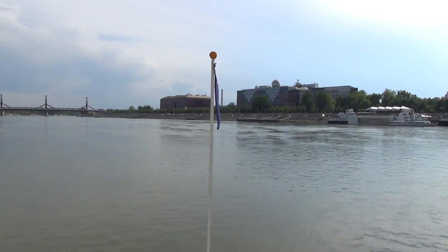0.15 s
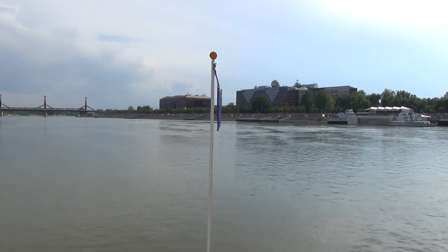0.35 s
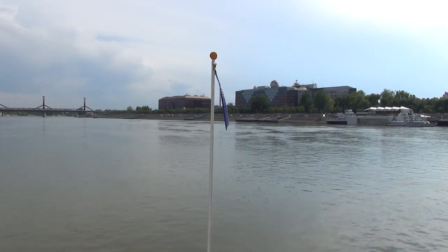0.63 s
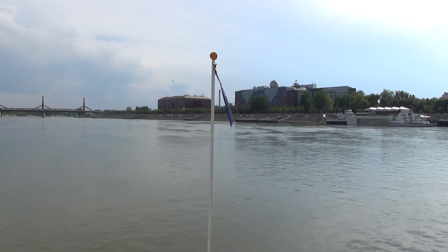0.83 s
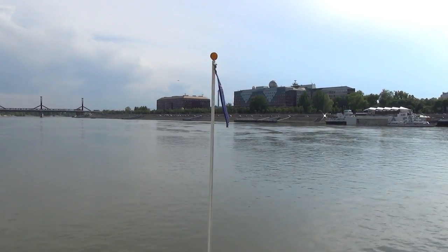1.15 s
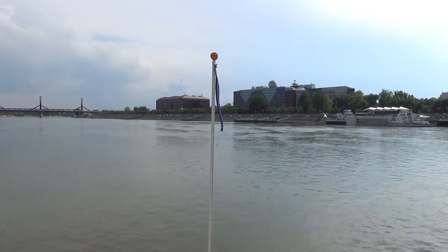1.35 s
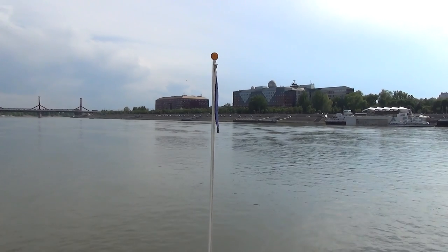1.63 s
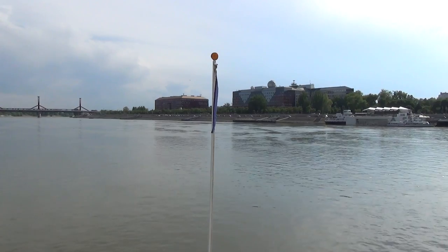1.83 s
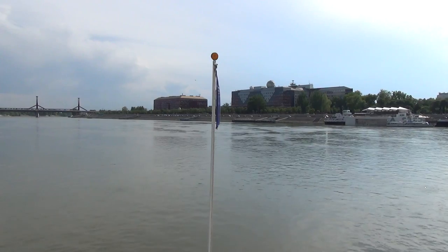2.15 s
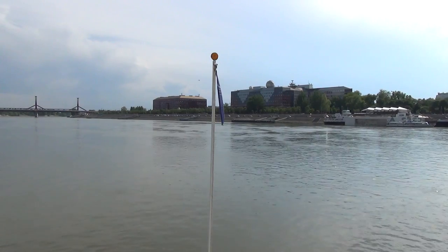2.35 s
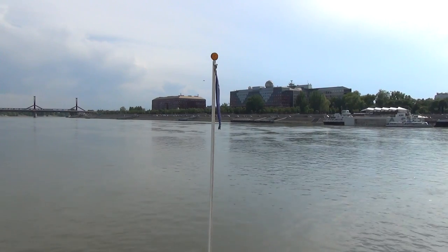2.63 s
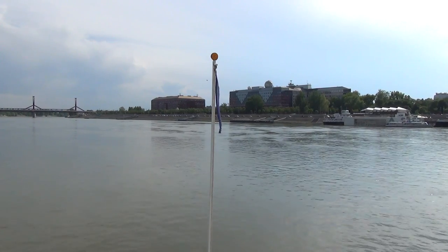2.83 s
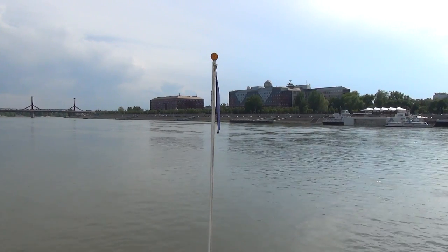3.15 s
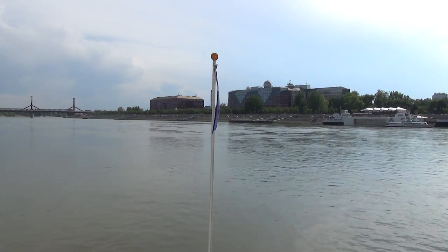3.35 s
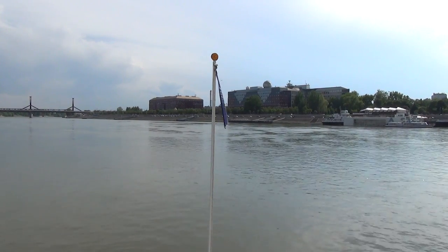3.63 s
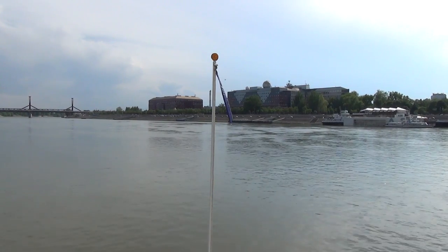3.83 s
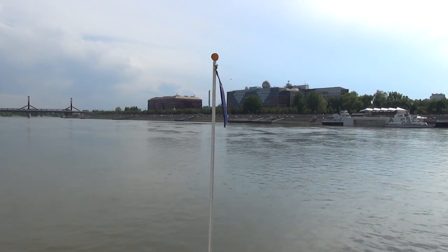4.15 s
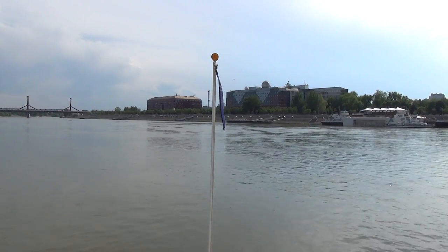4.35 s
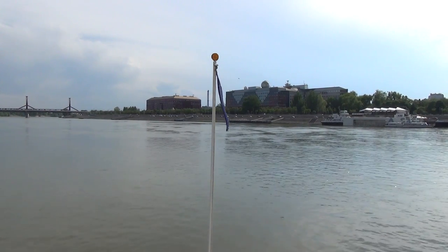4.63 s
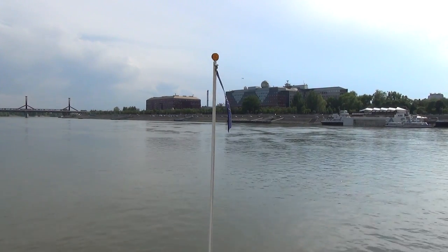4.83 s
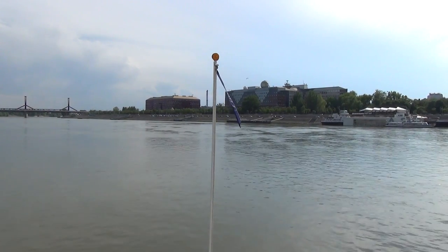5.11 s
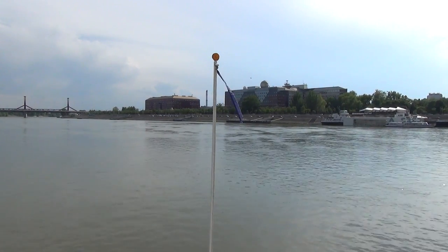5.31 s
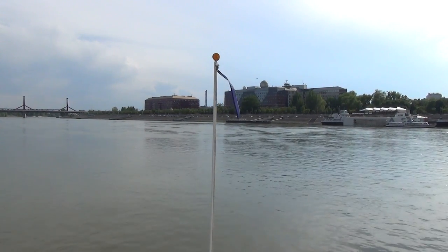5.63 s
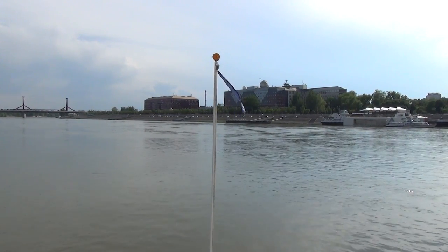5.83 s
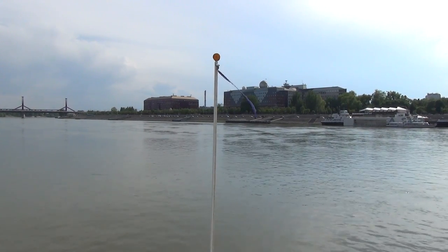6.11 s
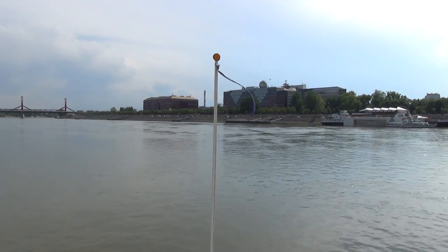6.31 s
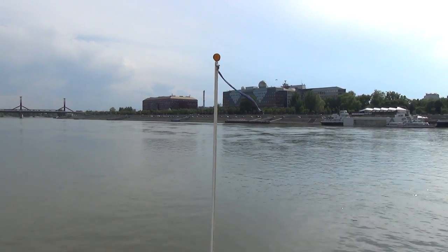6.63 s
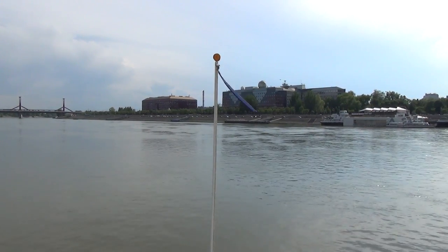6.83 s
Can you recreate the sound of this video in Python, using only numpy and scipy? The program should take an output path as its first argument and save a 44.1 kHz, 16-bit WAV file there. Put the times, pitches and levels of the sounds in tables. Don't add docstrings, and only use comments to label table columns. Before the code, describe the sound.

Open air on the foredeck of a river boat under way, heard through a small camera's stereo microphone. Throughout, a steady gear hum around 340 to 450 Hz throbs about four times a second, leaning slightly left, while bow water rushes softly on the right under thin, hissing spray. Low wind thuds, flutters and moans, with bursts near 0.1 and 0.4 seconds. A dry plastic tick with a tiny bounce snaps at 0.93, and a distant gull gives one short falling cry at 1.1 to 1.3. Gusts build from 1.7 and peak about 2.0 to 2.2, then ease, with smaller puffs afterwards. From 2.3 a loose fitting rattles brightly, turning regular from about 4.1 to 6.4, strongest near 4.3 and 5.2. Faint swallow chirps come at 0.5, 4.4 and 6.0 to 6.7. Deep soft shakes rumble around 6.0 and 6.3. A very faint high electronic whine persists.

```python
import sys
import numpy as np
from scipy import signal
from scipy.fft import rfft, irfft, next_fast_len
from scipy.io import wavfile
from scipy.ndimage import uniform_filter1d, map_coordinates

SR = 44100
rng = np.random.default_rng(int(sys.argv[2]) if len(sys.argv) > 2 else 0)


def boost_factor(decibels):
    exponent = np.asarray(decibels, float) / 20
    return 10 ** exponent


def pcm_store(signal):
    levels = np.round(np.clip(np.atleast_2d(signal), -1, 1) * 32767)
    wavfile.write(sys.argv[1], SR, levels.astype(np.int16).T)


N = 307377
T = np.arange(N) / SR


def unit(x):
    return x / np.sqrt(np.mean(x ** 2) + 1e-20)


def curves(rows):
    s, *columns = np.transpose(rows)
    return [np.interp(T, s, column) for column in columns]


def along(points, hz):
    f, v = np.transpose(points)
    return np.interp(np.log(hz + 1), np.log(f + 1), v)


def bump(centre_s, half_s):
    return np.exp(-((T - centre_s) / half_s) ** 2)


def wobble(rate):
    knots = rng.standard_normal(int(N * rate / SR) + 4)
    return map_coordinates(knots, [T * rate])


def placed(x, pan_db):
    return np.array([x * boost_factor(pan_db / 2), x * boost_factor(-pan_db / 2)])


def rush(spectrum, apart_db, patchy_db, lean=((1, 0),)):
    z = signal.stft(rng.standard_normal((2, N)), nperseg=512)[2]
    field = uniform_filter1d(rng.standard_normal(z.shape[1:]), size=6, axis=0)
    field = uniform_filter1d(field, size=12, axis=1)
    mid, side = signal.istft(z * boost_factor(patchy_db * unit(field)), nperseg=512)[1][:, :N]
    side = boost_factor(apart_db) * side
    m = next_fast_len(N + 8192)
    hz = np.fft.rfftfreq(m, 1 / SR)
    pair = rfft([mid + side, mid - side], m)
    colour = placed(boost_factor(along(spectrum, hz)), along(lean, hz))
    return unit(irfft(pair * colour, m)[:, :N])


def tones(lines, sway_db, turns=None):
    turns = rng.random(len(lines)) if turns is None else turns
    out = 0
    for (hz, db), turn in zip(lines, turns):
        level = np.sqrt(2) * boost_factor(db + sway_db * wobble(1.984))
        out = out + level * np.sin(2 * np.pi * (hz * T + turn))
    return out


MESH_HZ, SHAFT_HZ, FIRING_HZ = 112.47, 4.265, 64.36
# multiple of the mesh rate, shaft sideband number, level in dB.
GEAR = [(3, -1, -51), (3, 0, -38), (3, 1, -52), (3, 2, -45), (3, 3, -46.5), (3, 4, -54), (4, -1, -58),
        (4, 0, -46.5), (4, 1, -57), (4, 2, -50), (4, 4, -62)]
# pitch in Hz, level in dB.
TONES = [(FIRING_HZ, -40), (3 * FIRING_HZ, -46), (335.97, -53), (344.47, -51), (348.76, -55),
         (352.96, -48.5), (791.56, -60), (912.55, -60)]


def engine():
    hardest_s = .126
    against, against_turn = [(3, 1), (3, 4)], .4
    pair_turn = -.33
    gear = [(k * MESH_HZ + side * SHAFT_HZ, db) for k, side, db in GEAR]
    locked = [-side * SHAFT_HZ * hardest_s + against_turn * ((k, side) in against) for k, side, db in GEAR]
    hum = tones(gear, sway_db=1.3, turns=locked)
    hum = hum + tones(TONES, sway_db=2.5, turns=[pair_turn] * len(TONES))
    return placed(boost_factor(0.5) * hum, 2.4)


def jitter(count):
    from_s, to_s, level_db, ring_hz = 2.3, 6.7, -60, 6300
    when, size, pitch = rng.random((count, 3)).T
    start_s = from_s + (to_s - from_s) * when ** .7
    return np.transpose([start_s, level_db + 6.5 * (size - .5), ring_hz * (.85 + .45 * pitch ** 2)])


# start in seconds, peak in dB, ring in Hz.
THROWS = [(.205, -59, 5400), (2.657, -55, 6200), (2.901, -51, 6200), (3.142, -52, 5800), (3.37, -58, 5960),
          (4.08, -56, 5800), (4.31, -45, 6300), (4.545, -55, 6800), (4.774, -52, 8200), (5.011, -52, 8400),
          (5.207, -45, 5500), (5.245, -52, 5800), (5.487, -51.5, 5960), (5.719, -49.5, 6200),
          (5.953, -49.5, 6160), (6.185, -54.5, 7500), (6.419, -52, 6300), (6.885, -58, 6500)]
# start in seconds, peak in dB, ring in Hz.
PINGS = [(.364, -56, 6450), (.82, -58, 5970), (2.385, -50, 5950), (2.505, -61, 5800), (3.04, -60, 5840),
         (3.91, -53, 6500), (4.148, -58, 7300), (4.675, -61, 5750), (4.875, -59, 5700), (5.39, -58, 5900),
         (5.57, -61, 6000), (5.8, -60, 5800), (5.85, -59, 7000), (5.9, -61, 6000), (6.043, -54, 6000),
         (6.11, -58, 5770)]
# start in seconds, peak in dB, ring in Hz.
TAPS = [
    (2.331, -48, 5200),
    (3.093, -58, 6000),
    (3.31, -54, 7500),
    (4.243, -56, 5500),
    (4.321, -49, 7200),
    (4.328, -45, 6000),
    (4.337, -49, 6800),
    (5.211, -48, 5500),
    (5.294, -52, 6100),
]
# start in seconds, peak in dB,
# ring in Hz.
BUZZ = [
    (2.02, -62, 10500),
]


def rattle():
    # rows, length in seconds, broad share 0-1, width of the ring in Hz
    kinds = ((THROWS, 0.031, 0.58, 780), (PINGS, 0.017, 0.14, 350), (TAPS, 0.0065, .8, 700),
             (BUZZ, .2, .4, 700), (jitter(count=70), 0.0065, 0.14, 350))
    out, t = np.zeros(N + SR), T[:SR // 3]
    hz = np.fft.rfftfreq(len(t), 1 / SR)
    broad = 1 / (1 + (5100 / (hz + 1)) ** 8) / (1 + (hz / 9800) ** 5)
    for rows, length_s, share, width_hz in kinds:
        u = t / (0.33 * max(length_s, .003))
        shape = u * np.exp(1 - u) + .2 * (1 - np.exp(-u)) * np.exp(-u / 5)
        for s, db, ring_hz in rows:
            ring = .6 * np.exp(-((hz - ring_hz) / width_hz) ** 2)
            contacts = rng.standard_normal(len(t))
            grain = np.repeat(rng.standard_normal(len(t)), 90)[:len(t)]
            puff = unit(irfft(rfft(contacts * boost_factor(2.2 * grain)) * (ring + share * broad), len(t)))
            out[round(s * SR):][:len(t)] += boost_factor(db - 9) * puff * shape
    echo = boost_factor(-14) * np.roll(out, round(.0011 * SR))
    return np.array([out + echo, out - echo])[:, :N]


# time in seconds, strength in dB, eddy size as lean to the bass in dB,
# left-right in dB.
BREEZE = [(0, -22, 1.5, -0.5), (.45, -24.5, -3, -2), (1, -23, 1.5, -1.5), (1.45, -23, 1, -2),
          (1.7, -23, 3, -1), (1.95, -20.5, -1, -0.5), (2.2, -20.5, -1, -1), (2.26, -26.5, 2.5, -1.5),
          (2.95, -29, -2, -2.5), (3.5, -26.5, -1, -0.5), (3.7, -29.5, -4.5, -1.5), (4.4, -29.5, -2, -1),
          (4.66, -26.5, 4.5, 0), (4.85, -28, 3.5, -3), (5.35, -27, 0.5, 4), (5.8, -27, 0, 1.5),
          (6.35, -28, 2.5, 3), (6.9, -28.5, -1.5, -0.5)]
# time in seconds, rise in dB.
SHAKE = [(.04, 11), (.41, 8), (1.13, 10), (2.05, 12), (3.65, 9), (4.7, 11), (5.3, 8), (5.5, 10), (5.75, 11),
         (6.02, 21), (6.32, 18), (6.88, 15)]
# pitch in Hz, level in dB per Hz.
THUD = [(30, -61), (48, -17), (58, -10), (66, -1.5), (85, -6.5), (105, -2), (125, -4.5), (150, -20.5),
        (300, -120)]
FLUTTER = [(60, -45), (110, -9.5), (128, -7), (140, -1), (158, -2), (175, -5), (215, -3.5), (250, -4.5),
           (300, -11.5), (340, -15.5), (420, -32.5), (720, -120)]
DEEP = [(12, -52), (25, -17), (32, -11), (42, -3), (52, 0), (60, -12), (90, -120)]


def breeze():
    calm_db = -26
    eddy_db, eddies_per_s = 0.74, 9
    strength_db, size_db, pan_db = curves(BREEZE)
    over_db = strength_db - calm_db
    thud_db = -30.5 + 0.99 * over_db + size_db / 2 + eddy_db * wobble(eddies_per_s)
    flutter_db = -28.5 + 0.83 * over_db - size_db / 2 + eddy_db * wobble(eddies_per_s)
    deep_db = -53.5 + over_db + sum(db * bump(s, .11) for s, db in SHAKE)
    thud = boost_factor(thud_db) * rush(THUD, apart_db=-29.0, patchy_db=0.0)
    flutter = boost_factor(flutter_db) * rush(FLUTTER, apart_db=-22.0, patchy_db=-0.46)
    flutter = flutter * boost_factor([[-.6], [.6]])
    deep = boost_factor(deep_db) * rush(DEEP, apart_db=-22, patchy_db=2.0)
    return (thud + flutter) * placed(1, pan_db + 1.5 * wobble(6.7)) + deep


# centre in seconds,
# half length in seconds, start pitch in Hz, end pitch in Hz, level in dB.
MOANS = [(0.462, 0.17, 161, 157, -29.5), (0.686, 0.07, 122, 121, -27), (.9, 0.28, 66, 66.4, -33),
         (1.27, 0.078, 158, 155.6, -29), (1.715, 0.075, 112, 112, -24), (2.09, 0.082, 106.3, 108.4, -22),
         (2.16, 0.065, 143, 139, -29), (2.326, 0.063, 109.6, 109, -27), (2.6, 0.31, 149.4, 152.5, -31.5),
         (2.866, 0.051, 105.5, 107, -29), (3.197, 0.14, 109.4, 108.3, -32),
         (3.452, 0.087, 140.6, 135.6, -30), (3.534, 0.073, 65.9, 67, -33), (3.978, 0.069, 136.7, 142, -36),
         (4.197, 0.16, 148.8, 152, -30), (4.664, 0.045, 64.6, 65.4, -28), (4.652, 0.058, 109.4, 109, -31),
         (4.97, 0.081, 140, 141, -30), (5.33, 0.23, 100.5, 99.1, -28.5), (5.7, 0.15, 190, 195.6, -41),
         (6.104, 0.24, 65.35, 64.8, -32.5), (6.345, 0.057, 98.7, 98.4, -30.5),
         (6.802, 0.17, 133.6, 145, -31), (.55, 0.088, 68.1, 66.5, -34), (1.927, .07, 139.8, 150, -26),
         (4.3, .05, 105, 106, -34), (4.93, .05, 105, 103, -30), (5.624, .06, 66, 65, -29.5),
         (5.897, 0.14, 65.4, 64.7, -35), (6.36, .06, 70, 68, -32), (6.852, 0.04, 106, 104, -31),
         (6.945, 0.061, 67.94, 67, -33)]


def moans():
    waver = 1 + .035 * wobble(20)
    swing_db = 3.2 * wobble(30)
    out = 0
    for s, half_s, start_hz, end_hz, db in MOANS:
        hz = waver * np.interp(T, (s - half_s, s + half_s), (start_hz, end_hz))
        out = out + boost_factor(db) * bump(s, half_s) * np.sin(2 * np.pi * np.cumsum(hz) / SR)
    return placed(np.sqrt(2) * boost_factor(-1 + swing_db) * out, curves(BREEZE)[2])


# time in seconds, peak in dB, pitch in Hz.
PUFFS = [(.076, -15.5, 130), (.19, -19.5, 110), (0.361, -18, 151), (.389, -15.5, 180), (0.425, -16.5, 150),
         (1.243, -15.5, 157), (1.685, -17, 110), (1.816, -14.5, 129), (1.855, -17.5, 215),
         (1.985, -16, 226), (2.03, -13, 175), (2.078, -15, 130), (2.1, -16.5, 300), (2.116, -11.5, 190),
         (2.14, -18.5, 240), (2.199, -10.5, 135), (2.59, -18.5, 159), (2.673, -16, 138),
         (2.739, -17.5, 170), (3.02, -20.5, 240), (3.26, -21, 230), (3.397, -22, 170), (3.428, -18.5, 139),
         (4.144, -23, 190), (4.674, -18.5, 150), (4.945, -17, 120), (5.21, -20, 140), (5.789, -19.5, 160),
         (6.387, -21.5, 141)]
PUFF_CYCLES = 1.06


def puffs():
    out = 0
    for (s, db, hz), turn in zip(PUFFS, rng.random(len(PUFFS))):
        swing = np.sin(2 * np.pi * (hz * (T - s) + turn))
        out = out + boost_factor(db - 0.1) * bump(s, PUFF_CYCLES / hz) * swing
    return placed(out, curves(BREEZE)[2])


def lull():
    swept = 0.55 * sum(bump(s, PUFF_CYCLES / hz) for s, db, hz in PUFFS)
    return 1 - np.clip(swept, 0, .9)


# time in seconds, rush in dB, left-right in dB.
WAKE = [
    (0, -37.5, -4.5),
    (1.75, -38, -4.5),
    (3, -38.5, -4),
    (4.75, -38.5, -4),
    (6.97, -38.5, -4),
]
# pitch in Hz, left-right in dB.
LEAN = [(250, -8), (345, 5.5), (450, 1.5), (600, -1.5), (1200, -0.44), (3300, -1.3), (4200, 6.5)]
# pitch in Hz, level in dB per Hz.
RUSH = [(200, -120), (280, -2), (345, -1), (380, -3), (430, -5), (620, -5.5), (700, -9.5), (1000, -10.5),
        (1500, -17), (2100, -23.5), (3000, -33.5), (4000, -41.5), (4800, -49.5), (6000, -120)]
FIZZ = [(2500, -61), (4000, -23), (4800, -8), (5500, 0.5), (6500, -2), (7300, -3.5), (9000, -5),
        (12000, -8), (15700, -9.5), (17000, -15)]


def water():
    rush_db, pan_db = curves(WAKE)
    body = boost_factor(rush_db + 4.5) * rush(RUSH, apart_db=-28.0, patchy_db=0.6, lean=LEAN)
    body = body * placed(0.95, pan_db)
    spray_db = -64.5 + 0.15 * (T - T.mean()) + 0.5 * wobble(1.8)
    spray_db = spray_db + 2 * bump(2.16, 0.12)
    return body + boost_factor(spray_db) * rush(FIZZ, apart_db=-11.0, patchy_db=0.7)


# start in seconds, length in seconds, start pitch in Hz,
# top pitch in Hz, end pitch in Hz.
CHIRPS = [
    (0.51, .022, 3700, 3900, 3500),
    (4.396, 0.036, 3500, 5000, 3400),
    (4.462, 0.033, 3620, 4100, 3680),
    (6.034, 0.014, 2900, 3110, 3250),
    (6.278, 0.022, 3420, 3540, 3450),
    (6.594, 0.015, 3930, 3680, 3350),
    (6.634, .026, 4750, 5000, 4600),
    (6.648, 0.013, 3270, 3470, 3630),
]
FAR_CHIRPS = [(.545, .027, 3150, 3150, 2800), (.21, .014, 5170, 5340, 5040),
              (0.653, 0.017, 4900, 5000, 4900), (.662, .012, 5600, 5500, 5400),
              (4.454, 0.015, 3300, 3450, 3350), (5.174, .018, 3960, 4300, 4000),
              (5.998, 0.016, 3400, 3660, 3550), (6.255, 0.015, 4200, 3950, 3700),
              (6.318, 0.016, 3450, 3500, 3450), (6.66, .012, 4500, 4330, 4100),
              (6.28, .01, 4850, 4950, 4900), (6.335, .025, 3000, 3030, 2950)]
# time in seconds, pitch in Hz, level in dB.
GULL = [
    (1.122, 2160, -66),
    (1.132, 2180, -51),
    (1.155, 2240, -49.5),
    (1.18, 2175, -49.5),
    (1.205, 2130, -50),
    (1.235, 2110, -51),
    (1.265, 2090, -47),
    (1.292, 2070, -47.5),
    (1.303, 2060, -68),
]


def birds():
    out = np.zeros(N)
    calls = [(0, *row) for row in CHIRPS] + [(-3.5, *row) for row in FAR_CHIRPS]
    for far_db, s, length_s, start_hz, top_hz, end_hz in calls:
        u = np.linspace(0, 1, round(length_s * SR))
        arch = 1 - np.abs(2 * u - 1) ** 3
        hz = start_hz + (end_hz - start_hz) * u + arch * (top_hz - (start_hz + end_hz) / 2)
        db = far_db - 57 - 9 * np.log2(hz / 3500)
        db = db - 2 * (s > 5.5)
        chirp = np.abs(np.sin(np.pi * u)) ** 0.13 * np.sin(2 * np.pi * np.cumsum(hz) / SR)
        out[round(s * SR):][:len(u)] += boost_factor(db) * chirp
    out *= boost_factor(3.2 * wobble(350))
    hz, db = curves(GULL)
    calling = (T > GULL[0][0]) & (T < GULL[-1][0])
    phase = 2 * np.pi * np.cumsum(hz) / SR
    overtone = boost_factor(-17) * bump(1.212, .02) * np.sin(2 * phase)
    out += calling * boost_factor(db + 1.5 + 1.8 * wobble(70)) * (np.sin(phase) + overtone)
    echo_t = T[:SR // 20]
    echoes = rng.standard_normal(len(echo_t)) * boost_factor(-60 * echo_t / 0.099)
    echoes = echoes / np.linalg.norm(echoes)
    return out + boost_factor(-6) * signal.fftconvolve(out, echoes)[:N]


# pitch in Hz, level in dB, decay by 60 dB in seconds.
SHELL = [(2100, -15, .008), (2700, -14, .012), (3150, -8, .02), (3500, -1, .006), (4700, -11, .005),
         (6000, -9, .006), (6750, 0, .006), (7200, -11, .011), (8600, -11, .003), (9700, -10, .004),
         (10900, -10, .004), (11800, -14, .003), (14800, -11, .003)]
# pitch in Hz, left-right in dB.
TICK_LEAN = [(3000, -7), (6000, 0), (15000, 2)]
# pitch in Hz, level in dB.
CLOCK = [(7775, -95), (7800, -85), (7825, -84), (7850, -96), (7875, -99)]
LENS = [(13119.3, -93), (13235.4, -100), (13247.9, -81), (13260.4, -99)]
LENS_REST = (2.335, 3.465)


def camera():
    tick_s, tick_db = .92905, -27
    # start in seconds, level in dB, dulling in dB per kHz
    blows = ((tick_s, tick_db, 0), (tick_s + .0017, tick_db - 6, -1.1))
    tick = 0
    for start_s, blow_db, dull in blows:
        t = np.maximum(T - start_s, 0)
        for hz, db, t60 in SHELL:
            level = boost_factor(blow_db + db + dull * hz / 1000 - 60 * t / t60)
            tick = tick - placed(level * np.sin(2 * np.pi * hz * t), along(TICK_LEAN, hz))
    running = (T < LENS_REST[0]) | (T > LENS_REST[1])
    whine = tones(CLOCK, sway_db=.5) + boost_factor(1.2) * running * tones(LENS, sway_db=.8)
    return tick + whine


def scene():
    wind = lull() * (breeze() + moans()) + puffs()
    return engine() + rattle() + wind + water() + placed(birds(), -3.0) + camera()


def band_limit(x):
    return signal.sosfilt(signal.butter(12, 15760, fs=SR, output="sos"), x)


def record(dry):
    in_band = np.fft.rfftfreq(N, 1 / SR) < 15760
    kept = irfft(rfft(dry) * in_band, N)
    return band_limit(kept)


dry = scene()
out = record(dry)
pcm_store(out)
```